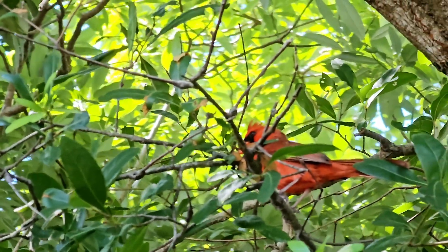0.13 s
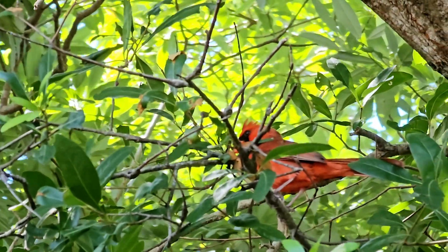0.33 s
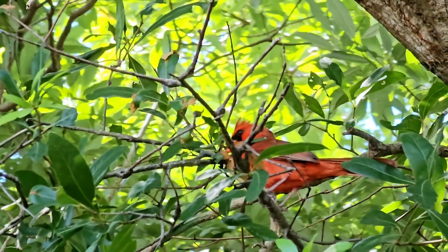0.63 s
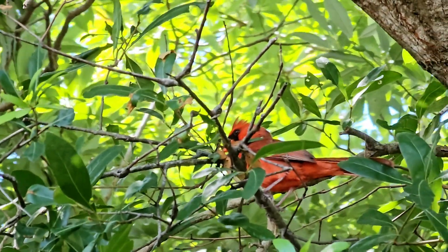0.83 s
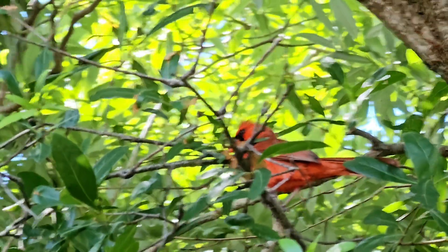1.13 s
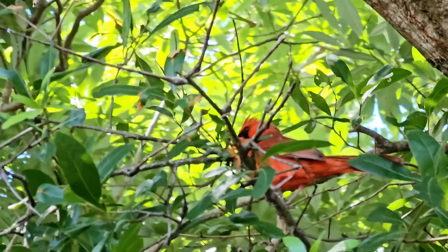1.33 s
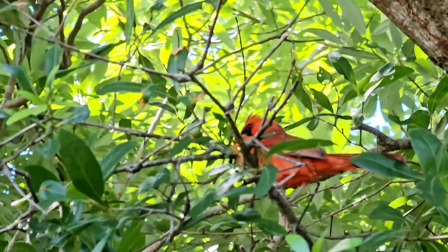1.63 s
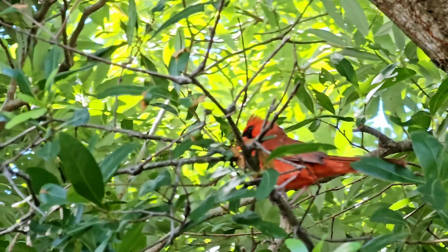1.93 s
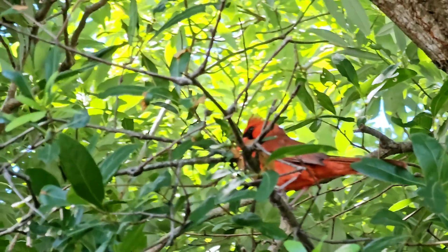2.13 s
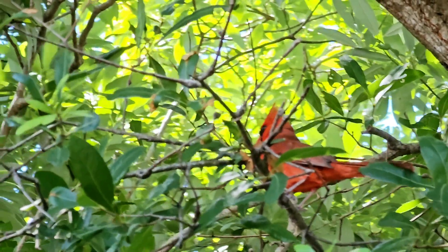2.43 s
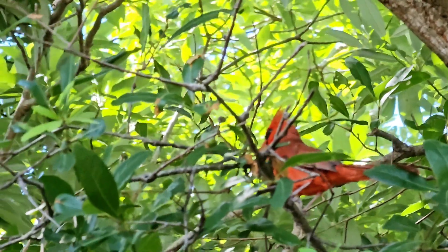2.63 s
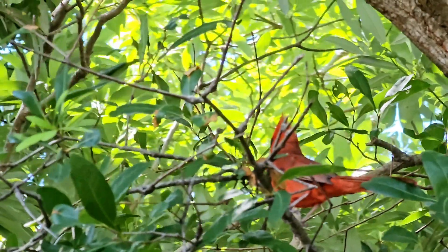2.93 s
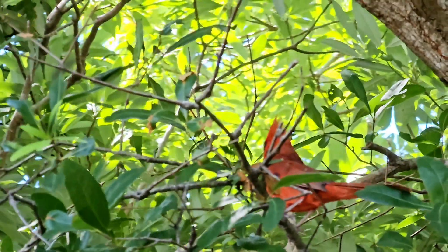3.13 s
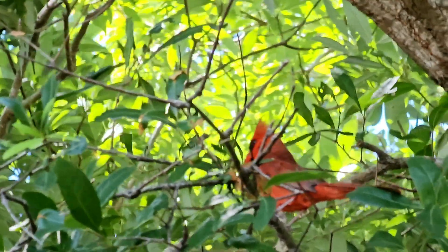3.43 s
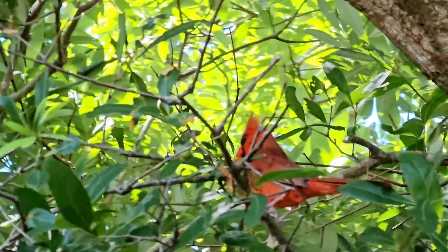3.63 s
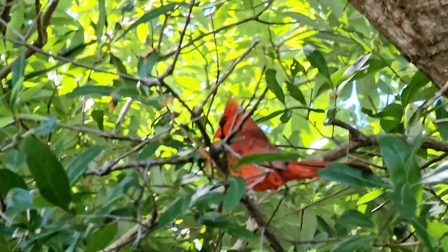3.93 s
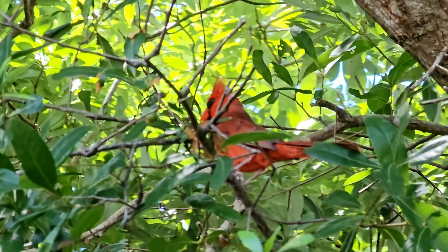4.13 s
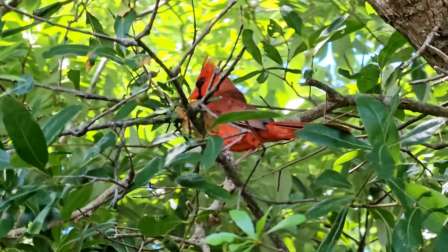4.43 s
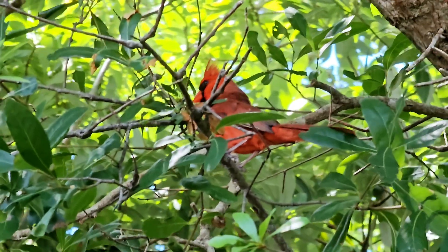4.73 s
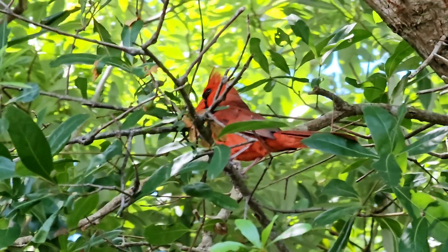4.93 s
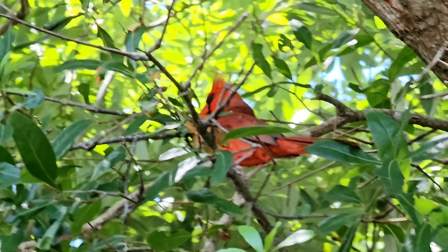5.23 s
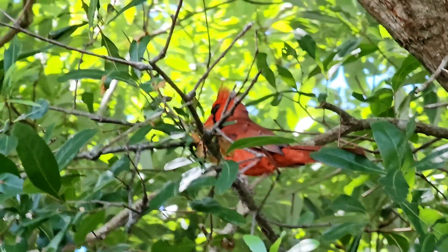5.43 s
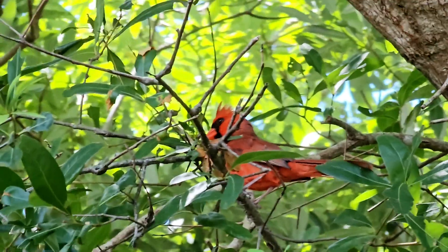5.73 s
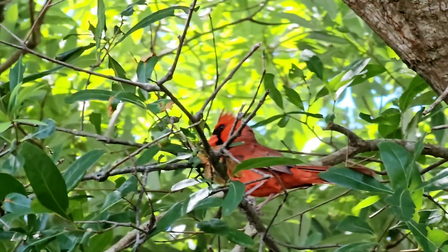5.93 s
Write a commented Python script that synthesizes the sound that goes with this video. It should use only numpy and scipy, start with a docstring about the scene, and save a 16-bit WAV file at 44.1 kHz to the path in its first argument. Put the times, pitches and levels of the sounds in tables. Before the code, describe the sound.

Outdoors among leafy branches, distant traffic rumbles low beneath a faint airy wash and a very thin steady insect buzz. A far bird calls faintly at first. Then a cardinal gives five quick rising chips, one soft falling slur, and eleven loud whistles, each snapping down from a tiny squeak into a sliding pure tone. Another thin, high whistle crosses the first. The stereo pickup catches the song clearly, slightly left, with short leafy echoes.

```python
"""In a leafy tree a cardinal sings five quick rising chips, a soft slur and eleven loud falling whistles.
Each note is a gliding tone with frayed overtones; ground and limbs echo it and foliage smears it.
A thin long whistle crosses the first loud note, and another bird calls far off.
An insect's double clicks ring its body in a steady buzz.
Filtered noise makes the distant traffic rumble and a faint wash of air."""
import sys
import numpy as np
from scipy import signal
from scipy.fft import rfft, irfft, next_fast_len
from scipy.io import wavfile
from scipy.ndimage import uniform_filter1d

SR = 44100
rng = np.random.default_rng(int(sys.argv[2]) if len(sys.argv) > 2 else 0)


def file_out(sig):
    """Save sig as 16-bit WAV at sys.argv[1]."""
    # one column per channel
    cols = np.atleast_2d(sig).T
    # limit, then scale
    lim = np.clip(cols, -1, 1)
    pcm = np.round(lim * 32767).astype(np.int16)
    wavfile.write(sys.argv[1], SR, pcm)


N = 268436

# Loud whistles: (foot of plunge [s], effort [dB], plunge stretch [ratio], slide length [s],
# pitch factor [ratio], bend height before pitch factor [Hz], squeak [dB], voice break [Hz],
# bite [dB], added overtones [dB])
WHISTLES = [(2.615, -24, 0.69, 0.17, 0.95, 506, -24, 4300, -1, 0.5),
            (2.974, -23, 0.56, 0.17, 0.95, 519, -21, 4630, 3.5, -3),
            (3.288, -20.5, 1.2, 0.16, 0.96, 601, -24.5, 4780, 7.5, -4),
            (3.5744, -19.5, 0.98, 0.15, 0.97, 600, -22.5, 4420, 5.5, -3),
            (3.824, -18.5, 1.33, 0.16, 0.97, 754, -20.5, 4520, 6.5, -3),
            (4.087, -18.5, 1.5, 0.16, 0.96, 648, -17.5, 5020, 7, -3),
            (4.3575, -18.5, 1.37, 0.15, 0.97, 648, -13, 5330, 9.5, -3),
            (4.62, -18.5, 1.4, 0.15, 0.96, 845, -16.5, 4560, 8.5, -4),
            (4.882, -19, 1.25, 0.15, 0.96, 642, -13.5, 5230, 10.5, -4),
            (5.137, -18.5, 1.4, .151, 0.96, 696, -15, 4700, 8.5, -4),
            (5.4202, -20.5, 1.52, 0.15, 0.96, 645, -17, 5070, 7, -1)]
# Chips: (top [s], effort [dB], pitch factor [ratio], low opening hook [dB])
CHIPS = [(1.552, -37, .97, -23.5), (1.712, -36.5, .99, -8), (1.89, -31, .99, -13), (2.052, -30, 1.015, -6),
         (2.206, -30.5, .98, -3.5)]
# Far bird's notes, before placement among the trees: (time [s], pitch [Hz], level [dB])
FAR_CALL = [(0.329, 2500, -70), (.38, 2790, -57), (.41, 3650, -69), (.48, 3600, -64), (.55, 3320, -63),
            (.62, 3100, -61), (.68, 3400, -67), (.72, 3700, -74)]
# Base overtone strength against the fundamental: (overtone frequency [Hz], level [dB])
OVERTONES = [(3000, -15.5), (3800, -26.5), (4500, -50), (6500, -47.5), (8200, -30.5), (9800, -39.5),
             (11800, -24.5), (13500, -35), (15000, -38.5)]
# Single echoes off ground and limbs at each microphone: (delay [s], gain [ratio])
ECHOES_LEFT = [(0.003423, 0.21), (0.005449, 0.11), (0.006036, 0.33), (0.007252, 0.11), (0.009104, 0.17),
               (0.013117, 0.09), (0.015212, 0.15), (0.018415, 0.13), (0.020402, 0.1)]
ECHOES_RIGHT = [(0.002297, 0.13), (0.003446, 0.3), (0.003883, 0.13), (0.006061, 0.29), (0.007685, 0.18),
                (0.01493, 0.16), (0.018089, 0.13), (0.019005, 0.13), (0.030202, 0.11)]
# Scatter from near leaves and from farther trees: (frequency [Hz], t60 [s], relative level [dB])
LEAVES = [(1470, 0.13, -7), (2130, 0.23, -5), (4060, 0.11, 7), (5800, 0.16, 11.5), (14000, 0.093, 1.5)]
TREES = [(1450, 0.5, 0), (4030, 0.87, 0), (8000, 1.3, 0), (14300, 0.29, 0)]
# Insect body resonances: (frequency [Hz], width [Hz], relative level [dB])
BODY_MODES = [(6400, 130, 3), (6120, 150, -4), (6610, 57, -3), (7300, 106, 0.5), (7680, 140, -17)]
# Spectrum shapes of traffic and air: (frequency [Hz], relative density [dB per Hz])
RUMBLE = [(12, -48), (20, -29), (24, -28), (35, -14), (54, 2), (69, -4), (87, -22), (102, -6.5), (119, -13),
          (128, -26), (140, -16.5), (163, -21), (229, -15.5), (267, -17.5), (330, -26.5), (430, -50),
          (730, -120)]
AIR = [(250, -21), (330, -2), (420, -3), (560, 0.5), (750, -5.5), (1200, -10.5), (2000, -17), (3000, -24),
       (4500, -23), (6000, -29), (8000, -31.5), (10000, -34), (12000, -37.5), (16000, -38)]
# Background left-right likeness: (frequency [Hz], correlation [-1 to 1])
LIKENESS = [(60, 0.97), (130, 0.9), (290, 0.85), (640, 0.42), (1410, -0.19), (3100, 0.22), (6820, -0.55),
            (15000, 0.19)]
# Background left-right balance: (frequency [Hz], left over right [dB])
BALANCE = [(60, 0.5), (110, 2.5), (200, 0), (380, 2), (700, 1.5), (1290, 3.5), (2380, 3), (4400, 3.5),
           (8120, -1), (15000, 6.5)]
# Cardinal's left-right balance: (frequency [Hz], left over right [dB])
SHADE = [(1500, 4), (2500, 1.5), (4500, 3.5), (7000, 2), (9000, 2.5), (12000, 4), (15500, 12)]
# Course of the traffic's deep drone, used about its mean: (time [s], level [dB])
DRONE = [(0.0, -40.5), (1.02, -35), (1.76, -39.7), (2.12, -37.5), (2.38, -42), (2.74, -38.5), (3.8, -40.5),
         (5.58, -34), (6.08, -44)]

RUMBLE_DB, AIR_DB = -37, -47.5
STROKES_HZ, CLICK_GAP_S = 61.75, .00276
EDGE_HZ = 16200

# Whistle contour; pitches precede each note's pitch factor, squeak and plunge times its stretch
SQUEAK_HZ, SQUEAK_S, PLUNGE_LEAD_S, PLUNGE_S = 7930, 0.0094, 0.00072, .0013
BEND_S, SLIDE_HZ, SLIDE_OCTAVES = .018, 2211.7, 0.53
SQUEAK_WAVER, SLIDE_WAVER = 0.0357, 0.0028  # random, share of pitch; the squeak adds to the slide
# Voice: strained above its break, biting below it; CREST is a share of the slide
BREAK_WIDTH_HZ, STRAIN_DB, BITE_BELOW_HZ, BITE_WIDTH_HZ = 530, 36, 1250, 580
CREST, FADE_DB, RELEASE_S = 0.25, -20, 0.021
# Chip contour; pitches precede each note's pitch factor
HOOK_HZ, HOOK_S, RISE_S, RISE_LEAD_S = 2338, 0.041, .0035, .011
HELD_HZ, HELD_S, OVERSHOOT_HZ, OVERSHOOT_S = 2896, 0.033, 159, 0.0065


def cardinal():
    """Chips, a slur and whistles, with tone and overtones placed separately among the trees."""
    chips = sum(chip(*row) for row in CHIPS)
    whistles = sum(whistle(*row) for row in WHISTLES)
    tone, overtones = chips + slur() + whistles
    heard = outdoors(tone, direct_db=-1.0, leaves_db=-5, trees_db=-20.0)
    # more of the overtones arrives by way of the foliage
    heard = heard + outdoors(overtones, direct_db=0.5, leaves_db=-4.5, trees_db=-11.5)
    # left is louder, most of all in the shortest waves
    shade_db = read(SHADE, np.fft.rfftfreq(next_fast_len(N), 1 / SR))
    return coloured(heard, amp([shade_db / 2, -shade_db / 2]))


def whistle(foot_s, effort_db, stretch, length_s, pitch, bend_hz, squeak_db, break_hz, bite_db,
            overtones_db):
    """A loud note opens on a strained squeak, plunges, bites, and slides slowly down as it fades."""
    t = moments(-SQUEAK_S * stretch, length_s)
    after_s = np.maximum(t, 0)
    done = after_s / length_s
    slide_hz = SLIDE_HZ * 2 ** (-SLIDE_OCTAVES * done) + bend_hz * np.exp(-after_s / BEND_S)
    plunged = step(t / stretch + PLUNGE_LEAD_S, PLUNGE_S)
    hz = pitch * (SQUEAK_HZ + (slide_hz - SQUEAK_HZ) * plunged)
    high = step(hz - break_hz, BREAK_WIDTH_HZ)
    bite = np.exp(-((hz - break_hz + BITE_BELOW_HZ) / BITE_WIDTH_HZ) ** 2)
    crest_db = FADE_DB * ((done - CREST) / (1 - CREST)) ** 2
    db = effort_db + squeak_db * high + bite_db * bite + crest_db
    db = db + fade_db(t, attack_s=.001, release_s=RELEASE_S)
    return sing(foot_s + t, hz, db, strain_db=overtones_db + STRAIN_DB * high,
                waver=SLIDE_WAVER + SQUEAK_WAVER * high, fray=1.06, odd_db=-4.0)


def chip(top_s, effort_db, pitch, hook_db, strain_db=-8, top_strain_db=7):
    """A quick note hooks up from a soft low start to a held top, straining as it overshoots."""
    t = moments(-HOOK_S, HELD_S)
    risen = step(t + RISE_LEAD_S, RISE_S)
    over = np.exp(-(t / OVERSHOOT_S) ** 2)
    hz = HOOK_HZ + (HELD_HZ - HOOK_HZ) * risen + OVERSHOOT_HZ * over
    db = effort_db + hook_db * (1 - risen) + fade_db(t, attack_s=0.014, release_s=0.012)
    return sing(top_s + t, hz * pitch, db, strain_db=strain_db + top_strain_db * over,
                waver=0.0055, fray=.4, odd_db=6.0, bright_db=1.0)


def slur(start_s=2.311, length_s=.122, top_hz=2400, foot_hz=1540, peak_db=-28.5, edge_db=-13):
    """The soft note before the whistles falls evenly under one arch of effort."""
    t = moments(0, length_s)
    done = t / length_s
    hz = top_hz + (foot_hz - top_hz) * done
    db = peak_db + edge_db * (2 * done - 1) ** 2 + fade_db(t, attack_s=0.0085, release_s=0.044)
    return sing(start_s + t, hz, db, strain_db=0.5, waver=0.0014, fray=0.36, odd_db=-17.0)


def sing(s, hz, db, strain_db=0., waver=.003, growth=0.53, fray=0., odd_db=0., bright_db=0.):
    """A wavering tone and frayed overtones that grow with effort, as rows of (2, N)."""
    s, hz, db = np.asarray(s), np.asarray(hz), np.asarray(db)
    at = np.arange(int(s[0] * SR), int(s[-1] * SR))
    at_s = at / SR
    noise = rng.standard_normal((10, SR // 2))[:, :len(at)]
    wobble = unit(uniform_filter1d(noise, size=130))
    glide_hz = np.exp(np.interp(at_s, s, np.log(hz)))
    pitch_hz = glide_hz * (1 + np.interp(at_s, s, waver * np.ones(len(s))) * wobble[0])
    phase = 2 * np.pi * np.cumsum(pitch_hz) / SR
    level = amp(np.interp(at_s, s, db)) * np.sqrt(2) * signal.windows.tukey(len(at), .02)
    k = np.arange(2, 11)[:, None]  # harmonic numbers
    harmonic_db = read(OVERTONES, k * pitch_hz) + odd_db * (k % 2) + bright_db * (k - 3)
    audible = k * pitch_hz < SR / 2
    stack = amp(harmonic_db) * audible * np.sin(k * phase + fray * wobble[1:])
    strain = np.interp(at_s, s, strain_db * np.ones(len(s))) + growth * (db.max() + 14.0)
    out = np.zeros((2, N))
    out[0, at] = level * np.sin(phase)
    out[1, at] = level * amp(strain) * stack.sum(0)
    return out


def other_birds():
    """The thin whistle and the far call, each with strong scatter from the foliage."""
    far = sing(*np.transpose(FAR_CALL), waver=0.033)[0]  # fundamental only
    return (outdoors(thin_whistle(), direct_db=-7.0, leaves_db=-9.0, trees_db=-10.5)
            + outdoors(far, direct_db=-9.5, leaves_db=-9.0, trees_db=-18))


def thin_whistle(start_s=2.581, length_s=0.358, top_hz=5210, end_hz=4010, sink_s=0.1, ease=1.5,
                 peak_db=-29, swell_s=0.12, onset_db=-29, fade_db_per_s=-52,
                 early_waver=.025, late_waver=0.0029):
    """A long thin note quavers as it sinks to a level pitch, swelling quickly and fading slowly."""
    t = moments(0, length_s)
    height = np.exp(-(t / sink_s) ** ease)
    hz = end_hz + (top_hz - end_hz) * height
    db = peak_db + onset_db * np.maximum(1 - t / swell_s, 0) ** 2
    db = db + fade_db_per_s * np.maximum(t - swell_s, 0)
    return sing(start_s + t, hz, db, strain_db=1.0, waver=late_waver + early_waver * height,
                fray=0.6, odd_db=7.0).sum(0)


def insect(buzz_db=-63.0, second_click=0.73, rasp_s=0.0068, left_db=-1.5):
    """Each stroke is a double click with a little noisy rasp, and rings the insect's body."""
    starts = np.zeros(N)
    starts[round(.0122 * SR)::round(SR / STROKES_HZ)] = 1
    clicks = starts + second_click * np.roll(starts, round(CLICK_GAP_S * SR))
    rasp = signal.oaconvolve(starts, np.ones(int(rasp_s * SR)))[:N] * rng.standard_normal(N)
    hz = np.fft.rfftfreq(next_fast_len(N), 1 / SR)
    body = 0
    for mode_hz, width_hz, mode_db in BODY_MODES:
        resonance = amp(mode_db) / (1 + 2j * (hz - mode_hz) / width_hz)
        body = body + resonance / np.sqrt(1 + ((hz - mode_hz) / 400) ** 2)  # steeper skirts
    buzz = unit(coloured(unit(clicks) + .3 * unit(rasp), body))
    direct = buzz * amp([[left_db / 2], [-left_db / 2]])
    return amp(buzz_db) * (direct + amp(-17.5) * scatter(buzz, LEAVES, .003))


def background():
    """Traffic's evened-out deep drone slowly swells under its murmur and a faint wash of air."""
    s, db = np.transpose(DRONE)
    swell = amp(np.interp(np.arange(N) / SR, s, db - db.mean()))
    rumble = wash(RUMBLE, patchy_db=.5)
    drone = signal.sosfiltfilt(signal.butter(4, 95, fs=SR, output="sos"), rumble)
    power = uniform_filter1d((drone ** 2).mean(0), size=12000)
    even = drone / np.sqrt(power)
    traffic = rumble - drone + drone.std() * unit(swell * even)
    return amp(RUMBLE_DB) * traffic + amp(AIR_DB) * wash(AIR, patchy_db=2.36)


def wash(spectrum, patchy_db):
    """Shaped noise with drifting patches, most alike at both microphones in the bass."""
    frames, hz = N // 1024 + 5, np.fft.rfftfreq(4096, 1 / SR)
    a, b, c, d, patches = rng.standard_normal((5, len(hz), frames))
    patches = uniform_filter1d(patches, size=24, axis=0)  # across frequency
    patches = unit(uniform_filter1d(patches, size=5, axis=1))  # across time
    same = np.clip(read(LIKENESS, hz), -1, 1)[:, None]
    left = a + 1j * b
    right = same * left + np.sqrt(1 - same ** 2) * (c + 1j * d)
    lean = amp(read(BALANCE, hz) / 2)[:, None]
    z = np.array([left * lean, right / lean])
    z *= amp(read(spectrum, hz)[:, None] + patchy_db * patches)
    return unit(signal.istft(z, nperseg=4096, noverlap=3072)[1][:, :N])


def outdoors(x, direct_db, leaves_db, trees_db):
    """Sums direct sound with its echoes, near leaf scatter and later tree scatter."""
    near = amp(leaves_db) * scatter(x, LEAVES, 0.0037)
    return amp(direct_db) * echoes(x) + near + amp(trees_db) * scatter(x, TREES, 0.043)


def echoes(x):
    """Direct sound and first echoes beat on a gliding note; the left microphone is a sample nearer."""
    left = x + sum(gain * np.roll(x, round(s * SR)) for s, gain in ECHOES_LEFT)
    right = x + sum(gain * np.roll(x, round(s * SR)) for s, gain in ECHOES_RIGHT)
    return np.array([left, np.roll(right, 1)])


def scatter(x, bands, start_s):
    """Random-sign reflections, different at each microphone, decay at each band's own speed."""
    signs = rng.choice([-1., 1.], (2, SR))
    present = rng.random((2, SR)) < 4000 / SR  # 4000 reflections per second
    taps = signs * present * (np.arange(SR) > start_s * SR)
    hz, t, z = signal.stft(taps, SR, nperseg=256)
    bands = np.array(bands)
    z = z * amp(-60 * t / read(bands[:, :2], hz)[:, None])
    decayed = signal.istft(z, SR, nperseg=256)[1]
    norm = np.linalg.norm(decayed, axis=1, keepdims=True)
    band_gain = amp(read(bands[:, ::2], hz))[:, None]
    tail = signal.istft(z * band_gain, SR, nperseg=256)[1]
    return signal.fftconvolve(x[None], tail / norm, axes=1)[:, :N]


def coloured(x, response):
    """Applies a frequency response."""
    size = next_fast_len(N)
    return irfft(rfft(x, size) * response, size)[..., :N]


def moments(start_s, end_s):
    """Time axis for the controls of a note [s]."""
    return np.linspace(start_s, end_s, 600)


def fade_db(t, attack_s, release_s):
    """Attack, hold and release over the times t [dB]."""
    gain = np.minimum((t - t[0]) / attack_s, (t[-1] - t) / release_s)
    return 20 * np.log10(np.clip(gain, .01, 1))


def step(x, width):
    """Smooth step from 0 to 1 around x = 0."""
    return .5 + .5 * np.tanh(x / width / 2)


def amp(db):
    """Decibels to amplitude ratio."""
    return 10 ** (np.asarray(db) / 20)


def unit(x):
    """Scales to rms 1."""
    return x / np.sqrt(np.mean(x ** 2) + 1e-20)


def read(points, hz):
    """Interpolates a spectrum on a log-frequency axis."""
    f, value = np.transpose(points)
    return np.interp(np.log(hz + 1), np.log(f + 1), value)


def scene():
    """Sums the cardinal, other birds, insect and background."""
    return cardinal() + other_birds() + insect() + background()


def record(dry):
    """The recorder's band limit: a linear-phase low-pass at EDGE_HZ."""
    lowpass = signal.firwin(511, EDGE_HZ, window=("kaiser", 9), fs=SR)
    return signal.oaconvolve(dry, lowpass[None], "same")


dry = scene()
out = record(dry)
file_out(out)
```